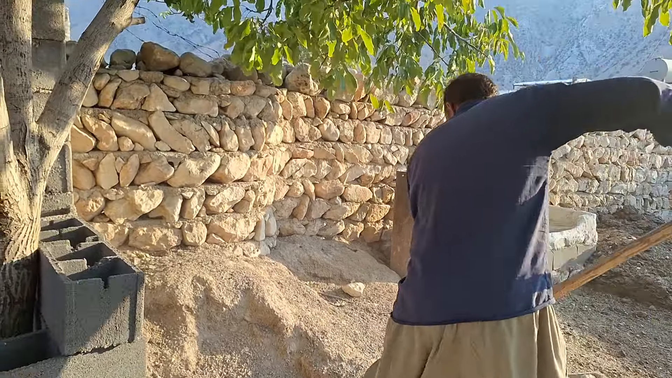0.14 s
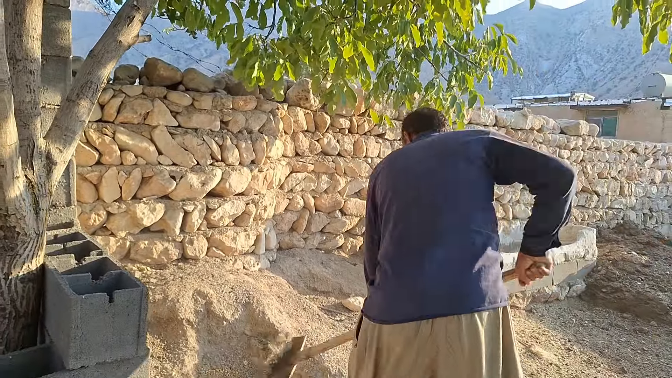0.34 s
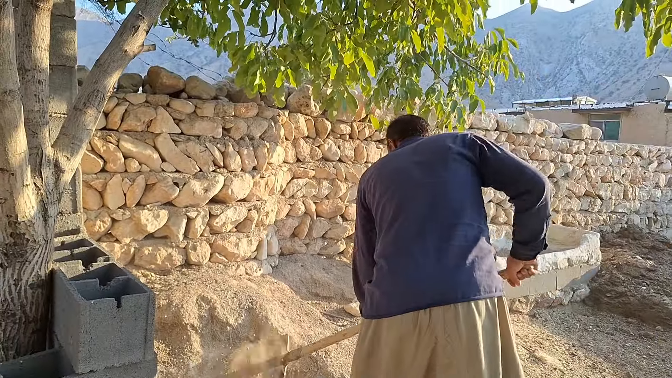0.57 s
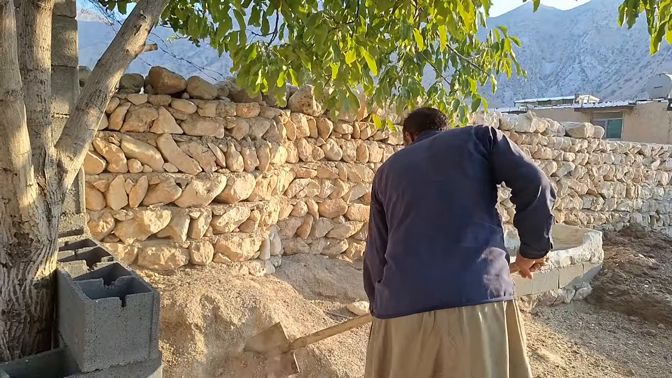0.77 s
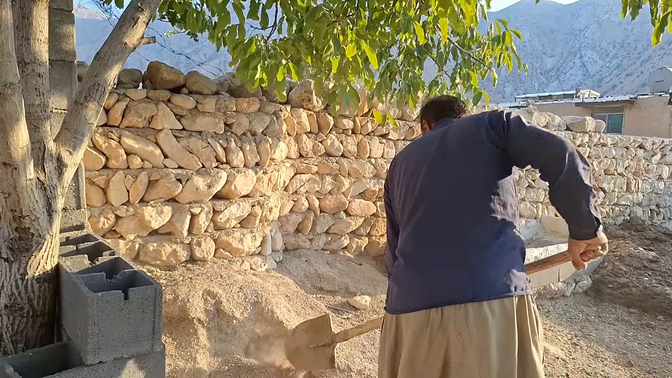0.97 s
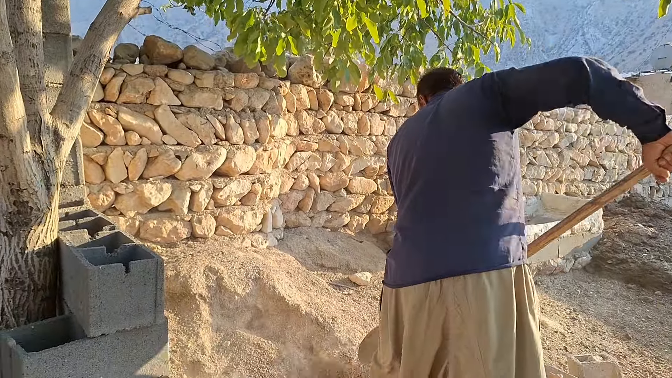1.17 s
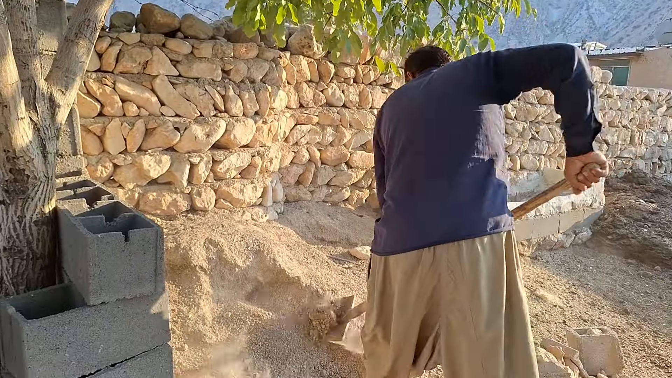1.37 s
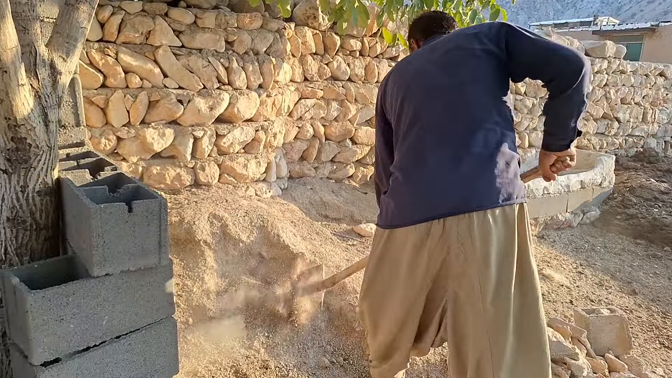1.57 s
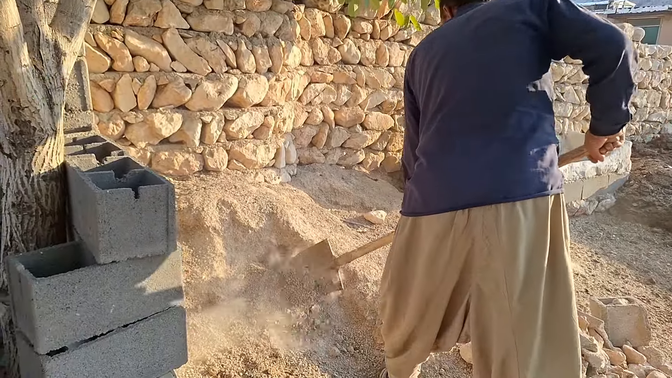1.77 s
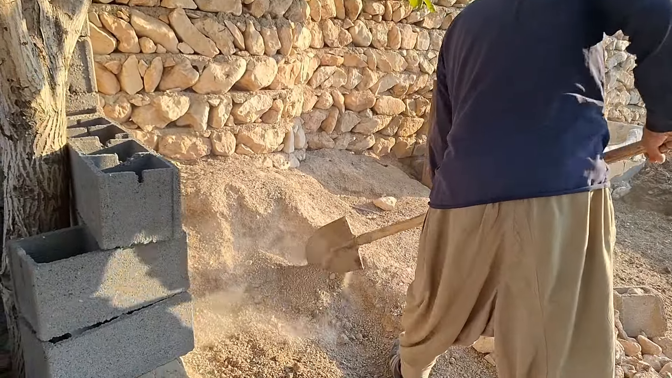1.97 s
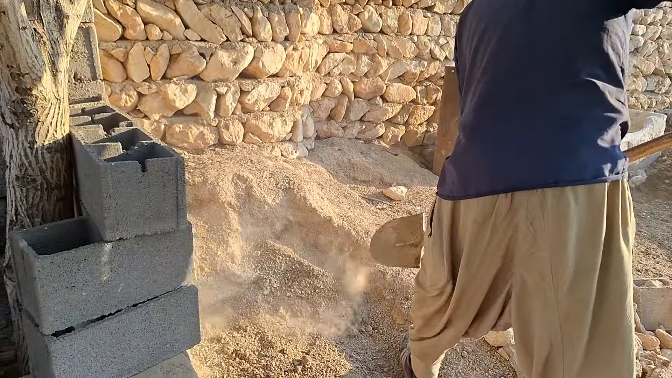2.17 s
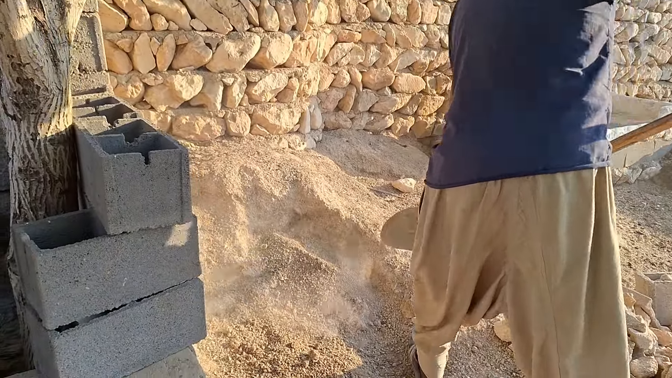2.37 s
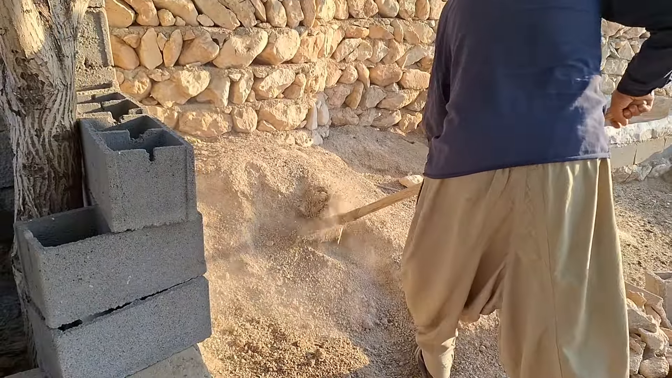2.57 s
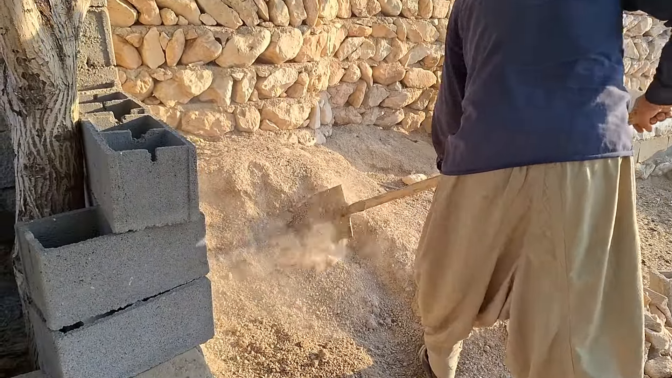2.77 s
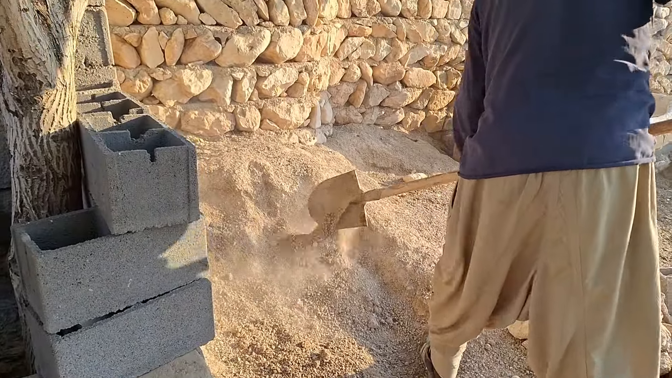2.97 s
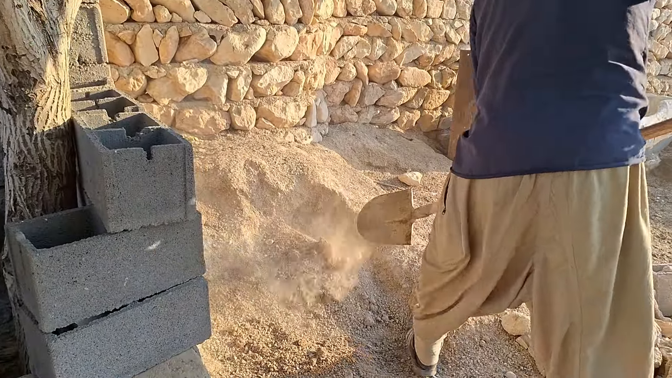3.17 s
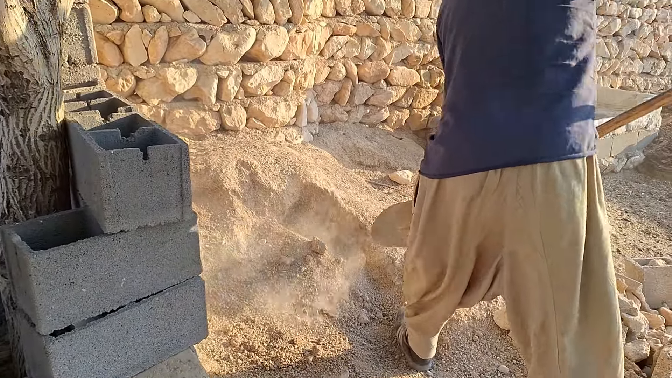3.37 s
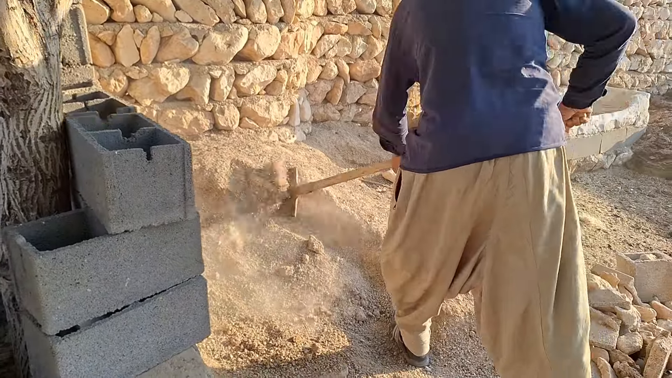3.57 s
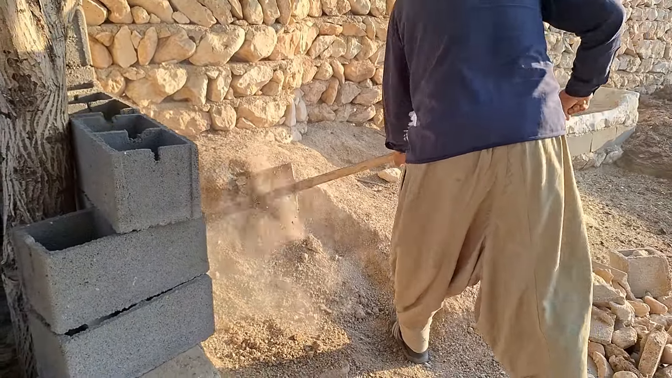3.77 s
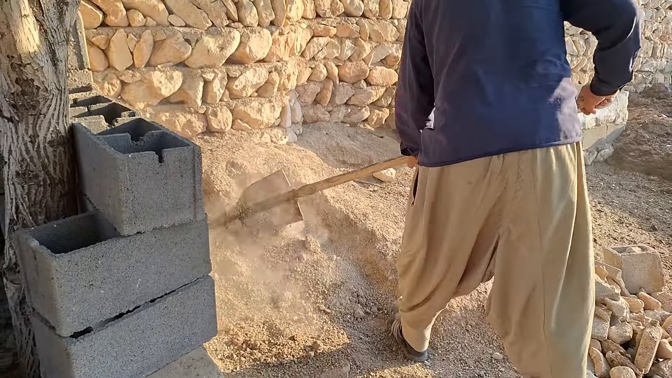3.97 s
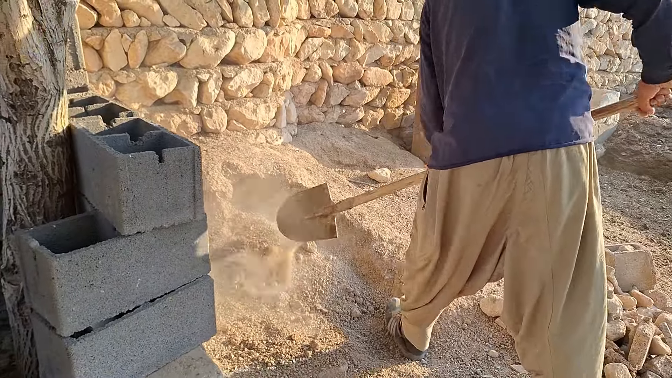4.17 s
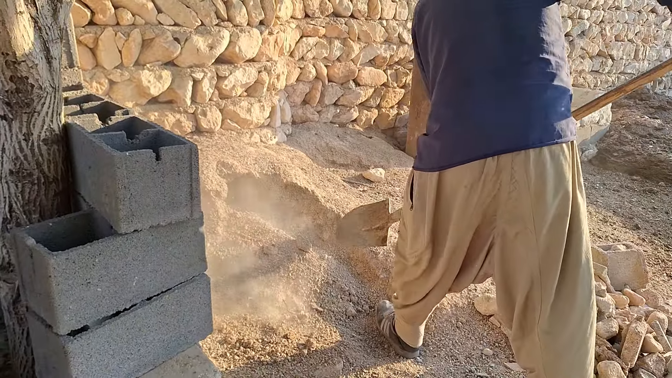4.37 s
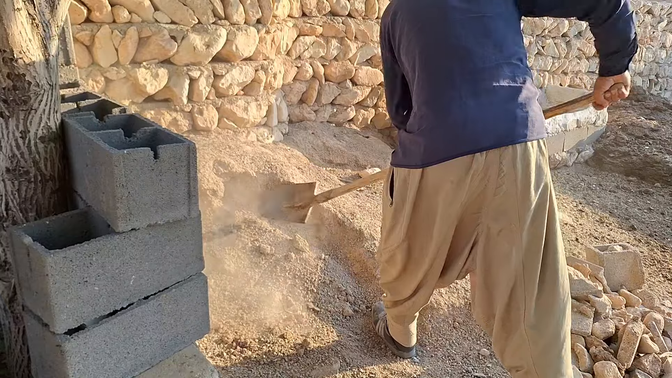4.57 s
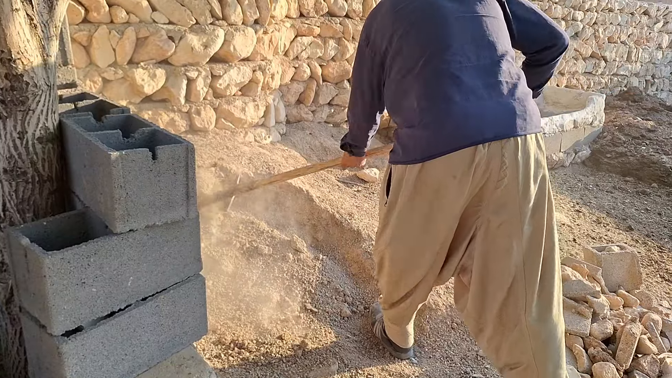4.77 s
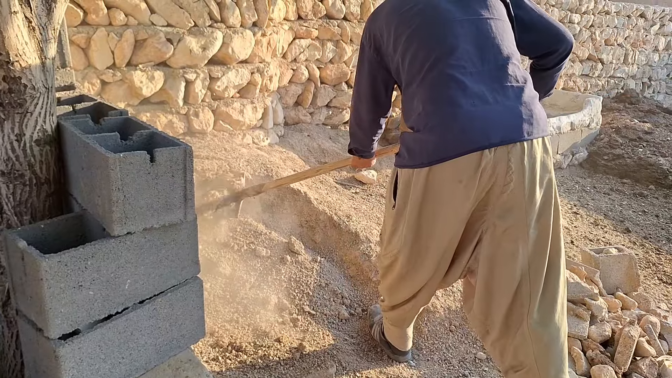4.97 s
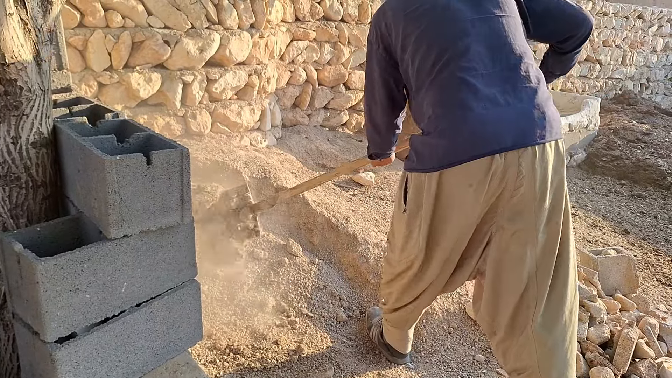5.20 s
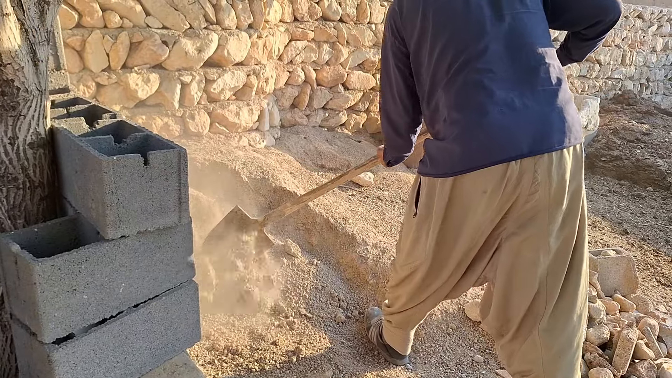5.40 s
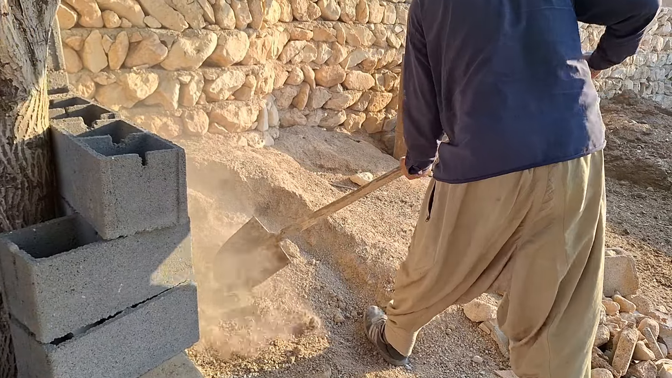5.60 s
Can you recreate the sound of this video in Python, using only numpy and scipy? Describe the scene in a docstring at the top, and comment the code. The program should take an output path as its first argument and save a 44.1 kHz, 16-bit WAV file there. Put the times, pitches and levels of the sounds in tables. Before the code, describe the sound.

A steel spade is driven five times into sand and gravel with loud gritty scrapes, sand trickling and pebbles ticking between, outdoors.

```python
"""A light wind buffets each port of a two-port phone microphone on its own, over a steady far hush.
A steel spade, left of the microphone, is driven five times into a heap of sand and gravel.
At each thrust, tiny grain impacts hiss and shake the blade's modes; the heap thuds under its loads.
Between thrusts sand slides off and trickles; pebbles tick as short sines with a noisy crack.
A stone wall answers with a fading noise tail; the last second brings a run of louder crunches and ticks."""
import sys
import numpy as np
from scipy import signal
from scipy.fft import rfft, irfft, next_fast_len
from scipy.io import wavfile
from scipy.ndimage import uniform_filter1d, map_coordinates

SR = 44100
rng = np.random.default_rng(int(sys.argv[2]) if len(sys.argv) > 2 else 0)


def master(y):
    """Save y as 16-bit WAV."""
    cut = np.clip(np.atleast_2d(y).T, -1, 1)
    pcm = np.round(cut * 32767)  # scale
    wavfile.write(sys.argv[1], SR, pcm.astype(np.int16))


N = 248724  # length in samples

# How far the left port hears the spade ahead of the right; each sound takes its own share of this.
# Each row: time in seconds, full lead in samples.
LEAD = [(0, 5.3), (1.3, 7), (2.5, 8.8), (3.5, 12), (4.6, 14), (5.64, 13)]
# The blade bites into the heap.
# Each row: start in seconds, grit hiss in dB, blade in dB relative to the hiss, extra dB of the low modes,
# belly modes in dB relative to the blade, time to fill in seconds, hold in seconds,
# release of the hiss in dB per second, ground thump in dB.
THRUSTS = [(0.32, -18, -2, 2.5, -8.5, 0.0054, 0.042, 270, -54.5),
           (1.336, -20, 1, 2, -4.5, 0.023, 0.087, 251, -46),
           (2.455, -17, 0.5, 4, -0.5, 0.011, 0.047, 226, -47),
           (3.524, -17.5, -2, 0, -10, .005, 0.027, 380.5, -60),
           (4.629, -18, -2, 2.5, -11, 0.0024, 0.015, 323.5, -41)]
# Fine sand trickling between the thrusts.
# Each row: time in seconds, hiss in dB, blade in dB relative to the hiss.
TRICKLE = [(0, -84, 13.5), (.31, -83, 22), (.45, -56.5, -0.5), (.8, -60.5, 3.5), (1.02, -67.5, -4),
           (1.15, -69, -9), (1.3, -77, 2), (1.6, -61, -11.5), (1.87, -65, 3), (2.3, -70.5, -3.5),
           (2.45, -92.5, 10), (2.6, -50.5, -1.5), (2.9, -64, -3), (3.2, -64, -15.5), (3.35, -71.5, -5.5),
           (3.51, -96, 21), (3.64, -45.5, -2), (3.9, -60, -0.5), (4.2, -59.5, -7.5), (4.4, -75, -11.5),
           (4.62, -99.5, 17.5), (4.78, -63, 8), (5.1, -54, -1.5), (5.64, -52, 0.5)]


def amp(db):
    """Turns dB into a gain."""
    return 10 ** (np.asarray(db) / 20)


def unit(x):
    """Scales x to rms 1."""
    return x / np.sqrt(np.mean(x ** 2) + 1e-20)


def along(points, hz):
    """Reads a curve of (Hz, value) points on a log frequency axis."""
    f, v = np.transpose(points)
    return np.interp(np.log(hz + 1), np.log(f + 1), v)


def curves(rows):
    """Gives one value per sample for each column after the time."""
    s, *cols = np.transpose(rows)
    return [np.interp(np.arange(N) / SR, s, c) for c in cols]


def wobble(rate):
    """A smooth random curve with this many random points a second."""
    points = rng.standard_normal(int(N * rate / SR) + 4)
    return map_coordinates(points, [np.arange(N) * rate / SR])


def since(s):
    """Seconds after a moment, 0 before it."""
    return np.clip(np.arange(N) / SR - s, 0, None)


def bump(centre, width):
    """A smooth swell of height 1, down to 37 percent one width (in seconds) from its centre."""
    return np.exp(-((np.arange(N) / SR - centre) / width) ** 2)


def filtered(x, response):
    """Multiplies the spectrum of x by a complex response of frequency."""
    m = next_fast_len(N + SR // 2)  # room for the ringing to end
    return irfft(rfft(x, m) * response(np.fft.rfftfreq(m, 1 / SR)), m)[..., :N]


def colour(spectrum):
    """A response that gives white noise of rms 1 this spectrum, still at rms 1."""
    return lambda hz: unit(amp(along(spectrum, hz)))


def grains(count, spread_db, lead_share, scatter):
    """Tiny impacts at rms 1; each lands at its own spot, so it reaches the two ports with its own lag."""
    when, luck, sign, spot = rng.random((count, 4)).T
    size = amp(-spread_db * np.log(1 - luck)) * np.sign(sign - .5)
    left = (when * N).astype(int)
    lag = lead_share * curves(LEAD)[0][left] + scatter * np.log(spot / (1 - spot))
    right = np.clip(left + np.round(lag).astype(int), 0, N - 1)
    return unit(np.array([np.bincount(i, size, N) for i in (left, right)]))


def air():
    """A far hush and microphone noise: coloured noise partly shared by both ports, drifting in level."""
    # Each row: frequency in Hz, relative level in dB.
    hush_spectrum = [(71, -38.5), (120, -1), (167, -13), (227, -1), (518, -15.5), (598, -17.5),
                     (1390, -23.5), (2100, -30), (15200, -43), (16500, -49)]
    shared, own = rng.standard_normal(N), rng.standard_normal((2, N))
    hush = filtered(unit(1.6 * shared + 0.19 * own), colour(hush_spectrum))
    return amp(-66.5 + 0.57 * wobble(2.1)) * hush


def wind():
    """Eddies thump one port at a time over a low rumble; each thrust shakes the ground under both."""
    # Each row: frequency in Hz, relative level in dB.
    rumble_spectrum = [(15, -40), (30, -15.5), (55, -2.5), (90, -6.5), (140, -21.5), (300, -37.5),
                       (1000, -87.5)]
    # Low rumble at both ports. Each row: time in seconds, level in dB.
    breeze = [(0, -48.5), (.55, -52), (.8, -60), (1.2, -60.5), (2.1, -57), (3.0, -58), (3.6, -49),
              (4.0, -52.5), (4.5, -65), (4.9, -49.5), (5.3, -41), (5.64, -53)]
    # Single eddies. Each row: time in seconds, level in dB, port that is thumped.
    eddy_rows = [(0.02, -30, "left"), (0.08, -34, "right"), (0.19, -33, "right"), (1.73, -39, "left"),
                 (1.97, -44, "left"), (2.26, -43, "left"), (2.45, -34, "left"), (2.55, -33, "left"),
                 (2.65, -32, "left"), (2.72, -36, "left"), (2.88, -45, "left"), (3.33, -31, "left"),
                 (3.5, -31, "left"), (3.6, -40, "left"), (4.25, -40, "left"), (4.55, -50, "left"),
                 (4.7, -38, "left"), (4.87, -35, "left"), (4.97, -32, "left"), (5.1, -31, "left"),
                 (5.28, -24, "left"), (5.4, -39, "left"), (5.58, -39, "left")]
    gust_width_s = 0.036
    thump_delay_s, thump_width_s = 0.11, 0.036  # the ground thump peaks after the bite

    lumps = amp(1.8 * np.array([wobble(10), wobble(10)]))
    eddies = unit(lumps * filtered(rng.standard_normal((2, N)), colour(rumble_spectrum)))
    gusts = []
    for port in ("left", "right"):
        power = sum((amp(db) * bump(s, gust_width_s)) ** 2 for s, db, side in eddy_rows if side == port)
        gusts.append(np.sqrt(power))
    thumps = sum(amp(row[-1]) * bump(row[0] + thump_delay_s, thump_width_s) for row in THRUSTS)
    shared = unit(filtered(rng.standard_normal(N), colour(rumble_spectrum)))
    return eddies * np.array(gusts) + shared * (amp(curves(breeze)[0]) + thumps)


def wall(x):
    """The wall answers with a noise tail, its own at each port, where each frequency dies at its own speed."""
    # Each row: frequency in Hz, time to fall by 60 dB in seconds.
    fade_times = [(200, 0.31), (2000, 0.25), (12000, 0.21)]
    hz, t, z = signal.stft(rng.standard_normal((2, SR // 3)), SR, nperseg=256)
    fade = amp(-60 * t / along(fade_times, hz)[:, None])
    tail = signal.istft(z * fade, SR, nperseg=256)[1]
    late = np.pad(x.mean(0), (300, 0))  # the answer starts 300 samples late
    return signal.fftconvolve(late[None], tail / np.linalg.norm(tail[0]), axes=1)[:, :N]


def heap():
    """Packed sand answers each load with a dull swell: low-pitched grain noise that rises and dies."""
    # Each row: frequency in Hz, relative level in dB.
    thud_spectrum = [(70, -34.5), (120, -8), (160, -10), (220, -2), (300, -7), (400, -16), (800, -35)]
    # Each row: start in seconds, level in dB, time to fall by 60 dB in seconds.
    loads = [(0.336, -22.5, 0.28), (1.35, -23, 0.3), (2.005, -39, 0.6), (2.481, -25, 0.38), (3.24, -49, .2),
             (3.534, -23.5, 0.16), (4.633, -34, 0.24), (5.217, -41.5, 0.58), (5.345, -38.5, 0.28),
             (5.441, -44.5, 0.46)]
    rise_s = .014
    load = 0
    for s, db, t60 in loads:
        t = since(s)
        load = load + amp(db - 60 * t / t60) * (1 - np.exp(-(t / rise_s) ** 2))
    grain = grains(count=30000, spread_db=2.5, lead_share=0.078, scatter=2.1)
    return filtered(grain * load * amp(0.82 * wobble(26)), colour(thud_spectrum))


def steel_knocks():
    """A pebble gives a short, rough tick with a crack; the bare blade rings on in its modes."""
    # Pebbles striking the steel. Each row: time in seconds, level in dB, pitch in Hz.
    pebbles = [(0.019, -37.5, 877), (0.152, -44, 1000), (0.241, -41, 987), (0.571, -31, 1283),
               (0.661, -37, 830), (1.028, -39, 1223), (1.313, -31, 1500), (1.347, -10, 1439),
               (1.379, -3.5, 1274), (1.393, -13, 1268), (2.818, -37, 1323), (3.248, -36, 715),
               (3.265, -45.5, 600), (3.802, -33, 2040), (3.899, -35, 1172), (3.914, -33, 945),
               (3.928, -32, 1048), (3.96, -42, 1114), (5.212, -24, 549), (5.265, -19, 3484),
               (5.272, -29.5, 600), (5.297, -26, 3670), (5.316, -30, 658), (5.345, -16.5, 1263),
               (5.358, -21.5, 1018), (5.438, -26, 674), (5.535, -34.5, 625), (5.562, -35, 3587),
               (5.579, -33.5, 587)]
    # The unloaded blade sings. Each row: time in seconds, level in dB.
    sings = [(0.691, -51.5), (2.828, -57), (4.088, -55.5)]
    # Modes of the free blade. Each row: frequency in Hz, level in dB, time to fall by 60 dB in seconds.
    free_blade = [(1337, 1, 0.9), (2450, -13, 0.089)]
    tick_t60_s, crack_t60_s = 0.017, 0.041  # times to fall by 60 dB

    out, t = np.zeros(N + SR), np.arange(SR // 2) / SR
    for s, db, hz in pebbles:
        jitter, grit_noise = rng.standard_normal((2, len(t)))
        # an uneven stone blurs the pitch
        phase = 2 * np.pi * hz * t + .16 * np.cumsum(jitter)
        tick = amp(-60 * t / tick_t60_s) * np.sin(phase)
        crack = 1.1 * amp(-28.5 - 60 * t / crack_t60_s) * np.diff(grit_noise, prepend=0)
        soft_start = 1 - np.exp(-t / 0.00038)
        out[round(s * SR):][:len(t)] += amp(db) * (tick * soft_start + crack)
    for s, db in sings:
        ring = sum(amp(level - 60 * t / t60) * np.sin(2 * np.pi * hz * t) for hz, level, t60 in free_blade)
        out[round(s * SR):][:len(t)] += amp(db) * ring * (1 - np.exp(-t / 0.0045))
    # the right port hears the same knocks later
    late = np.arange(N) - np.round(0.74 * curves(LEAD)[0]).astype(int)
    return np.array([out[:N], out[np.clip(late, 0, N)]])


def bite(s, fill, hold, release):
    """Gain of one thrust: sudden contact, filling up, a sagging hold, a steady release."""
    contact_s, fill_db, sag_db_per_s = 0.0025, 12.5, 22  # fill_db: how far under full level it starts
    t = since(s)
    filling = -fill_db * np.exp(-t / fill)
    sag = -sag_db_per_s * np.minimum(t, hold)
    db = filling + sag - release * np.clip(t - hold, 0, None)
    return (1 - np.exp(-(t / contact_s) ** 2)) * amp(db)


def motion():
    """Gains of the hiss and of the low, middle, high and belly modes; the powers of all moving grit add up."""
    # Low, middle and high modes in dB relative to the blade level, while trickling and in a thrust.
    trickle_modes_db = (-3.5, -0.5, -4.5)
    thrust_modes_db = (-12, -1.5, -4.5)
    # Release of the low, middle, high and belly modes, as a multiple of the hiss release.
    blade_release = (.9, .85, .85, 1.4)
    # Short crunches of gravel on the steel. Each row: start in seconds, time to fall by 60 dB in seconds,
    # hiss in dB, low modes in dB, middle modes in dB, high modes in dB.
    crunches = [(2.678, 0.099, -42.5, -50, -44, -45), (2.692, .25, -49, -46.5, -45.5, -45.5),
                (3.676, .15, -52, -66, -57, -43.5), (3.8, 0.072, -52.5, -67, -56, -48.5),
                (3.846, 0.11, -42, -50.5, -56, -65), (3.885, 0.054, -57, -51, -58, -50),
                (3.945, 0.13, -50.5, -70, -57, -59.5), (4.096, 0.053, -54.5, -73, -54, -60),
                (4.822, .06, -54, -70, -64, -56), (5.211, 0.19, -46.5, -40, -47, -54.5),
                (5.266, .1, -34.5, -40, -34.5, -30), (5.298, .1, -36.5, -35, -38, -31.5),
                (5.345, .15, -36.5, -32, -28, -31.5), (5.44, .12, -40.5, -39.5, -36, -39),
                (5.535, .1, -56, -45.5, -54, -63), (5.563, 0.26, -52, -62.5, -44, -47),
                (5.611, .15, -55.5, -63, -50, -49)]
    # Loads of sand sliding over the blade or landing. Each row: centre in seconds, half length in seconds,
    # hiss in dB, low modes in dB, middle modes in dB, high modes in dB.
    slides = [(0.01, 0.056, -74, -53, -58.5, -64), (0.155, 0.049, -67.5, -49.5, -55.5, -63),
              (0.873, 0.07, -57, -63, -51.5, -56.5), (1.278, 0.15, -72, -90, -70, -63.5),
              (1.953, 0.048, -53.5, -50, -47, -51), (2.03, 0.043, -68.5, -48.5, -47, -60),
              (2.08, .045, -70, -46, -56, -65), (2.826, 0.13, -66, -61.5, -55.5, -59),
              (3.268, 0.038, -68, -60, -58, -68), (3.765, .025, -54, -60, -52, -50),
              (3.87, 0.02, -74, -56, -57, -68), (4.045, 0.044, -55.5, -63.5, -48, -52),
              (5.185, .035, -47.5, -53, -55.5, -53), (5.253, .025, -38.5, -41, -36.5, -36.5),
              (5.318, .025, -42, -42, -38.5, -37), (5.362, 0.023, -39, -58, -33, -42),
              (5.456, .015, -44.5, -51, -41.5, -41.5)]
    # the edge knocks as it enters: low, middle, high and belly modes in dB relative to the hiss
    entry_db, entry_t60_s = np.array((-5, -9.5, -14, -7.5)), 0.063
    blade_lag_s = .005  # the blade's modes are held a little longer than the hiss
    crunch_rise_s, spike_db, spike_s = 0.0012, 6, .004  # the first contact of a crunch stands out

    hiss_db, blade_db = curves(TRICKLE)
    power = np.zeros((5, N))
    trickle_db = [hiss_db, *(hiss_db + blade_db + db for db in trickle_modes_db)]
    power[:-1] = amp(trickle_db) ** 2
    for s, db, blade_db, low_db, belly_db, fill, hold, release, _ in THRUSTS:
        power[0] += (amp(db) * bite(s, fill, hold, release)) ** 2
        offsets_db = np.append(np.add(thrust_modes_db, [low_db, 0, 0]), belly_db)
        modes_db = db + blade_db + offsets_db
        for k, (level, share) in enumerate(zip(modes_db, blade_release), start=1):
            power[k] += (amp(level) * bite(s, fill, hold + blade_lag_s, share * release)) ** 2
        knock = (since(s) > 0) * amp(-60 * since(s) / entry_t60_s)
        power[1:] += np.outer(amp(db + entry_db), knock) ** 2
    for s, t60, *dbs in crunches:
        t = since(s)
        rise = 1 - np.exp(-(t / crunch_rise_s) ** 2)
        fade = amp(spike_db * np.exp(-t / spike_s) - 60 * t / t60)
        power[:-1] += np.outer(amp(dbs), rise * fade) ** 2
    for s, half, *dbs in slides:
        power[:-1] += np.outer(amp(dbs), bump(s, half)) ** 2
    return np.sqrt(power)


def shifting_load(x, depth_db):
    """Sliding sand damps now one part of the blade, now another: patches of gain over time and frequency."""
    z = signal.stft(x, nperseg=512)[2]
    field = rng.standard_normal(z.shape[1:])
    field = uniform_filter1d(field, size=3, axis=0)  # smooth over frequency
    field = uniform_filter1d(field, size=6, axis=1)  # smooth over time
    return signal.istft(z * unit(amp(depth_db * unit(field))), nperseg=512)[1][:, :N]


def modes(low_hz, high_hz):
    """The blade modes in a range, passed twice for steep skirts; white noise keeps rms 1."""
    # The blade damped by sand. Each row: frequency in Hz, width in Hz, relative level in dB.
    damped_blade = [(600, 370, -4), (763, 224, 4.5), (1068, 342, -5), (1213, 232, -2.5), (1392, 396, -1),
                    (1964, 570, -2), (2280, 347, 2), (2896, 875, -12), (3420, 1200, -4.5), (4085, 470, 7),
                    (4780, 1800, -5.5)]
    group = [mode for mode in damped_blade if low_hz <= mode[0] < high_hz]

    def ring(f):
        """Resonances of alternating sign, summed and then squared."""
        total = 0
        for k, (centre, width, db) in enumerate(group):
            resonance = 1j * f * width / (centre * centre - f * f + 1j * f * width)
            total = total + (-1) ** k * amp(db / 2) * resonance  # half the dB, as it passes twice
        return total ** 2

    return lambda f: ring(f) / np.sqrt(np.mean(np.abs(ring(f)) ** 2))


def grit():
    """Grains hiss against each other and shake the damped blade; coarser grains shake lower modes."""
    # Each row: frequency in Hz, relative level in dB.
    hiss_spectrum = [(2500, -33.5), (4200, -10.5), (5200, -0.5), (7300, -0.5), (9500, -0.5), (11900, -1.5),
                     (13900, -5), (15000, -3), (15700, -10)]
    # Trickling sand is brighter than the bite. Each row: frequency in Hz, relative level in dB.
    fines_spectrum = [(6000, -29.5), (10000, -11.5), (13000, 1), (16000, 4)]

    hiss_gain, low_gain, middle_gain, high_gain, belly_gain = motion()
    clumps = wobble(70)  # grit arrives in handfuls
    fine = grains(count=200000, spread_db=1.0, lead_share=0.98, scatter=1.0)
    fine = fine * amp(0.58 * clumps + 1.2 * wobble(170))
    small = grains(count=120000, spread_db=2.0, lead_share=0.91, scatter=1.8)
    small = shifting_load(small * amp(1.6 * clumps + .9 * wobble(90)), depth_db=1.0)
    medium = grains(count=60000, spread_db=1.5, lead_share=0.68, scatter=1.7)
    medium = shifting_load(medium * amp(1.7 * clumps + 2.2 * wobble(110)), depth_db=1.5)
    coarse = grains(count=30000, spread_db=2.5, lead_share=.8, scatter=2)
    coarse = shifting_load(coarse * amp(.5 * clumps + 1.8 * wobble(50)), depth_db=1.5)

    blade = filtered(coarse * low_gain, modes(0, 1070))
    blade += filtered(medium * middle_gain, modes(1070, 3050))
    blade += filtered(small * high_gain, modes(3050, 9000))
    blade += filtered(coarse * belly_gain, modes(1070, 1600))
    hiss = filtered(fine * hiss_gain, colour(hiss_spectrum))
    fines_gain = amp(curves(TRICKLE)[0] - 18)  # 18 dB under the trickle's hiss
    return hiss + filtered(fine * fines_gain, colour(fines_spectrum)) + blade


def scene():
    """Adds up spade, heap, wall, wind and hush."""
    spade = grit() + heap() + steel_knocks()
    return spade + amp(-11.5) * wall(spade) + wind() + air()


def record(dry):
    """The converter rounds off high peaks, the phone's body tilts the ports apart and the top treble is cut."""
    # Each row: frequency in Hz, left minus right in dB.
    port_tilt = [(100, 3.5), (700, -0.5), (1300, 2.5), (2400, -2.5), (4400, 1), (8000, 0.5), (15000, -3)]
    roll_hz, top_hz = 15760, 16800  # 32 dB down above the first, nothing from the second upward
    soft = dry / (1 + np.abs(dry / .8) ** 4) ** .25

    def response(hz):
        """Half the tilt up on the left and half down on the right, with the treble cut."""
        tilt_db = np.outer([.5, -.5], along(port_tilt, hz))
        return amp(tilt_db - 32 * (hz > roll_hz)) * (hz < top_hz)

    return filtered(soft, response)


dry = scene()
out = record(dry)
master(out)
```